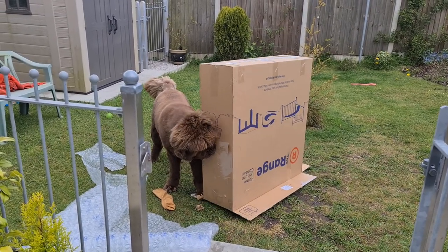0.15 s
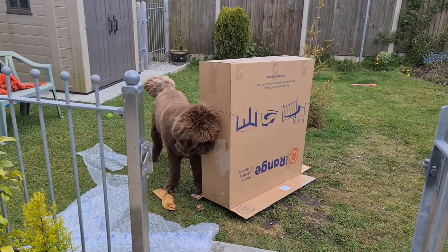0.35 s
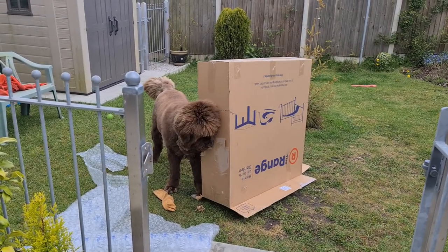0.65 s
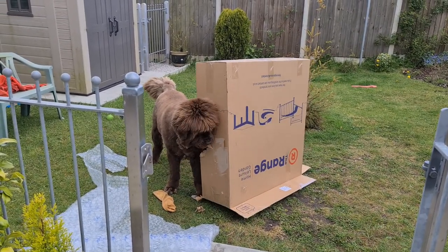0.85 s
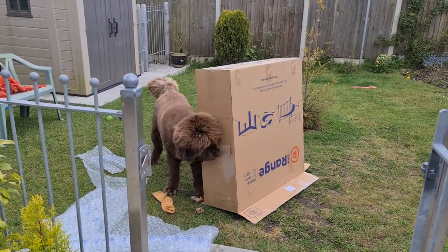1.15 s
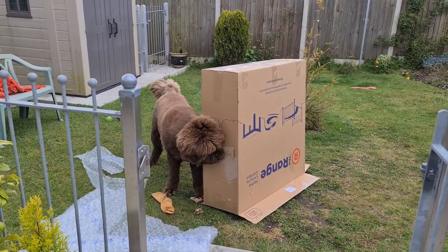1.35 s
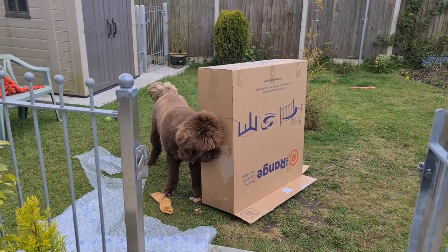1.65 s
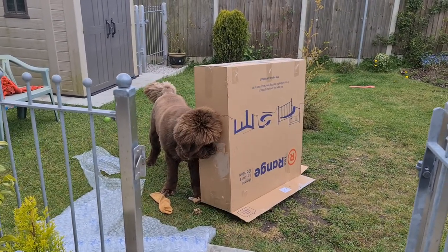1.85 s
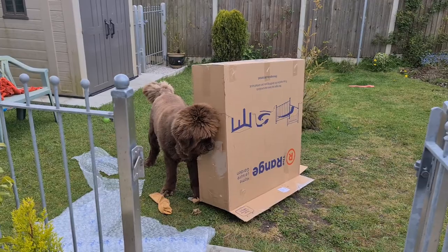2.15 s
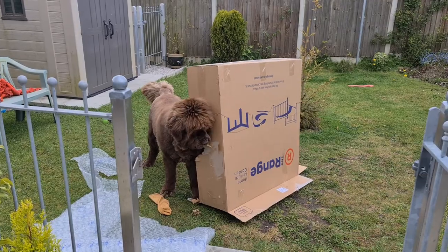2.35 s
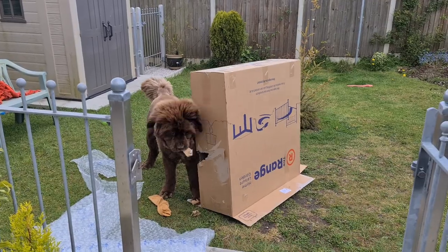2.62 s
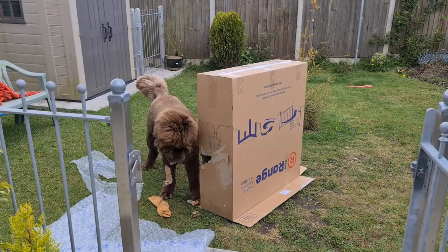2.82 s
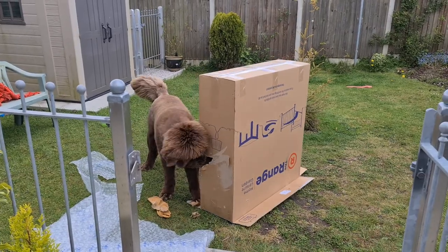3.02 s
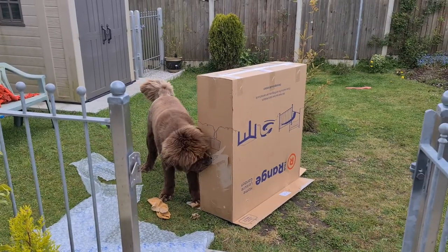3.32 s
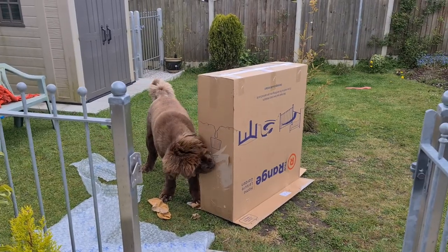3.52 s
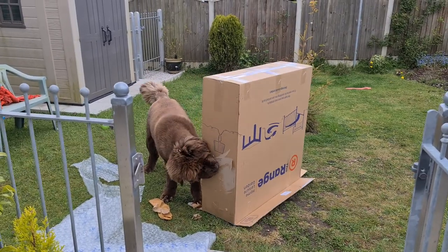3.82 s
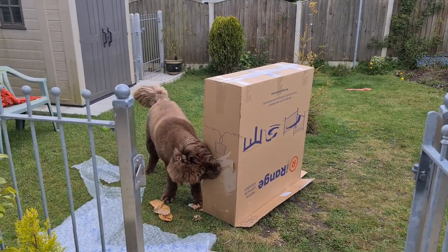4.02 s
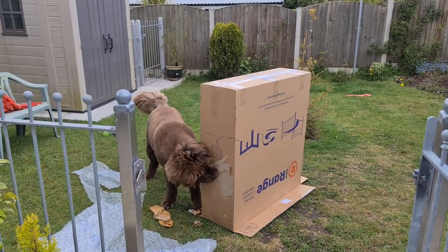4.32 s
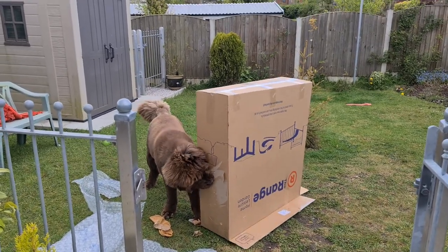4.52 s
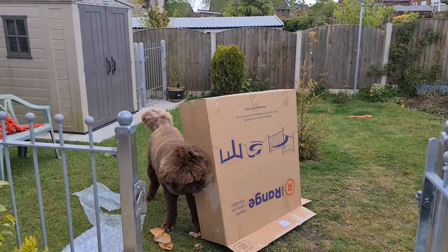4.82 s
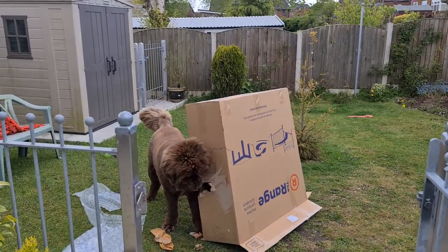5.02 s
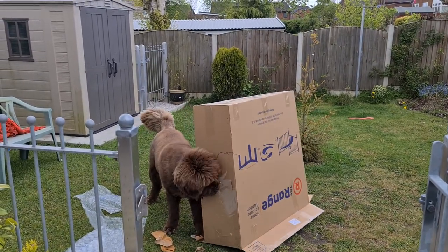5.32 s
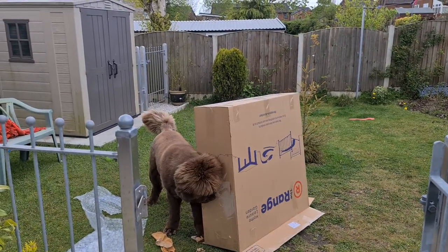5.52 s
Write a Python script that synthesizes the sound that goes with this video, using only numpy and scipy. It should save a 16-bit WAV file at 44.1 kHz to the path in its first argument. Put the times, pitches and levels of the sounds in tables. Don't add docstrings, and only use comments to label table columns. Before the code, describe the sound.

In a garden, a large dog chews a big empty cardboard box. Small pops and knocks come first, then drum-like jolts, a dense burst of booms, crunches and ripping midway, a lull with a bird's falling whistle, then hard knocks and sharp cracks before light scraping. A handheld stereo microphone a few metres away catches a short echo from fences and shed.

```python
import sys
import numpy as np
from scipy import signal
from scipy.fft import rfft, irfft, next_fast_len
from scipy.io import wavfile
from scipy.ndimage import uniform_filter1d, map_coordinates

SR = 44100
rng = np.random.default_rng(int(sys.argv[2]) if len(sys.argv) > 2 else 0)


def file_out(sig):
    cols = np.atleast_2d(sig).T
    lim = np.clip(cols, -1, 1)
    pcm = np.round(lim * 32767).astype(np.int16)
    wavfile.write(sys.argv[1], SR, pcm)


def volts(x):
    e = np.asarray(x, float) / 20
    return 10 ** e


N = 250047


def unit(x):
    return x / np.sqrt(np.mean(x ** 2) + 1e-20)


def along(points, hz):
    point_hz, value = np.transpose(points)
    return np.interp(np.log(hz + 1), np.log(point_hz + 1), value)


def filtered(x, response):
    size = next_fast_len(N + SR // 2)
    hz = np.fft.rfftfreq(size, 1 / SR)
    return irfft(rfft(x, size) * response(hz), size)[..., :N]


def wobble(rate_hz):
    knots = rng.standard_normal(int(N * rate_hz / SR) + 4)
    return map_coordinates(knots, [np.arange(N) * rate_hz / SR])


def fibres(spectrum, clump_db, spike_db, ring_db, crack=0):
    clumps_db = clump_db * wobble(45) + clump_db * wobble(220)
    size = volts(clumps_db + spike_db * wobble(1500))
    parting = rng.random(N) < 800 / SR
    size *= 1 + crack * rng.exponential(size=N) * parting
    z = signal.stft(size * rng.standard_normal((2, N)), nperseg=512)[2]
    field = uniform_filter1d(rng.standard_normal(z.shape[1:]), size=3, axis=0)
    field = uniform_filter1d(field, size=6, axis=1)
    rung = signal.istft(z * volts(ring_db * unit(field)), nperseg=512)[1][:, :N]
    return unit(filtered(rung, lambda hz: volts(along(spectrum, hz))))


# pitch_hz, level_db (per Hz)
HUSH_COLOUR = [(15, -85.5), (25, -23.5), (60, -18), (120, -25.5), (287, -2.5), (419, -9), (550, -2),
               (647, -3.5), (1810, -3.5), (3380, -15), (4440, -19), (8050, -18.5), (9220, -8.5),
               (10600, -15), (15000, -21.5), (16300, -39)]


def hush():
    level = volts(-65 + 0.52 * wobble(3.74))
    return level * fibres(HUSH_COLOUR, clump_db=-1.34, spike_db=2.5, ring_db=2.0)


def slope(start_s, end_s, rise_s, fall_s):
    t = np.arange(N, dtype=np.float32) / SR
    before = np.maximum(start_s - t, 0) / abs(rise_s)
    after = np.maximum(t - end_s, 0) / abs(fall_s)
    return -20 * (before + after)


# peak_s, level_db, rise_s (20 dB), fall_s (20 dB)
WEIGHT_HEAVES = [(0, -36.5, .02, 0.17), (.2, -44, 0.4, .5), (0.268, -33, 0.11, 0.05),
                 (.42, -39, 0.09, 0.1153), (.6, -51, -0.8, 0.3817), (.87, -38, 0.01, 0.2542),
                 (1.05, -50, 1.5, 0.77), (1.4, -54, 1, 1.5), (1.57, -48, 0.19, 0.2),
                 (1.83, -44.5, 0.19, -0.02), (1.96, -46.5, 0.58, 0.14), (2.22, -36, 0.0655, 0.21),
                 (2.34, -26, 0.1442, 0.2774), (2.46, -28, 0.0919, 0.1443), (2.56, -29.5, 0.1265, 0.0356),
                 (2.65, -51, .1, 0.18), (2.8, -58.5, .6, 0.47), (3.07, -53.5, -0.62, -3.17),
                 (3.21, -48, 0.3, -0.22), (3.53, -59, .3, 0.6), (3.72, -47, 0.1139, -0.05),
                 (3.82, -43, 0.19, 0.12), (3.99, -44.5, 0.107, 1), (4.13, -30, 0.1189, 0.29),
                 (4.3, -38, 0.1143, 0.27), (4.44, -47, 0.36, -0.33), (4.69, -34, 0.3264, 0.315),
                 (4.8, -30.5, 0.2834, 0.3187), (4.891, -27.5, 0.2914, 0.0591), (5, -39, 0.37, 0.1544),
                 (5.1, -50.5, 0.9, 0.13), (5.33, -46.5, -0.27, 0.38), (5.45, -53.5, .3, 1.78),
                 (5.57, -50, 0.28, -1)]


def heaves():
    pushes = [volts(db + slope(s, s, rise_s, fall_s)) for s, db, rise_s, fall_s in WEIGHT_HEAVES]
    return volts(-112) + np.max(pushes, axis=0)


# start_s, length_s, board_db, paper_db, swell_db (by the end)
HELD_PULLS = [(0.029, 0.1788, -55, -63, 7), (0.226, 0.0416, -51, -52.5, 5.5),
              (0.352, 0.0414, -52.5, -59, 7.5), (0.493, 0.0749, -63, -66.5, 4),
              (0.616, 0.024, -53, -54.5, 0.5), (0.81, 0.09, -37, -42, -4), (0.906, 0.47, -54, -67, -2),
              (1.408, 0.4586, -57, -62.5, 9.5), (1.877, 0.358, -50.5, -53, -2),
              (2.198, 0.1123, -43.5, -45.5, -2), (2.275, 0.187, -40.5, -44.5, 8.5),
              (2.458, 0.0964, -35, -34.5, 0.16), (2.495, 0.0657, -34, -37, -1),
              (3.114, 0.0496, -45, -75, 1), (3.191, 0.0422, -54.5, -74, -0.5),
              (3.356, 0.058, -62, -67.5, -11.5), (5.398, 0.111, -61.5, -71.5, 3),
              (3.58, 0.1184, -68, -90, 10.5), (4.053, 0.0573, -66.5, -90.5, 19),
              (4.332, 0.269, -57, -54.5, 0.1), (4.707, .18, -44.5, -52, 3.5), (4.86, .03, -40.5, -52.5, 4),
              (1.42, .45, -75, -75, 1), (5.026, 0.1478, -49.5, -59, -1.09),
              (5.239, 0.1172, -49.5, -76, 0.5), (5.544, 0.012, -56, -52.5, -1),
              (5.577, 0.103, -58.5, -74.5, -2.5), (5.197, 0.138, -70, -66, -0.5),
              (2.963, 0.112, -62, -72.5, 0.5)]
# start_s, board_db, paper_db, fall_s (20 dB)
GRIP_SLIPS = [(0, -53.5, -62.5, -1.38), (.268, -44, -50, 0.19), (0.405, -34, -42, 0.0623),
              (0.65, -36, -38.5, 0.0894), (1.378, -41.5, -75, 0.09), (2.14, -38, -40, 0.0766),
              (2.59, -54.5, -68, 0.2648), (2.778, -55.5, -71.5, 0.5), (3.123, -41.5, -63.5, 0.068),
              (3.712, -55.5, -66, 0.4361), (3.78, -50.5, -51.5, 0.05), (3.88, -50.5, -62, 0.08),
              (4.109, -32.5, -58, 0.09), (4.273, -47, -69, 0.25), (4.538, -39, -44.5, 0.398),
              (4.909, -41, -55.5, 0.1965), (5.37, -62.5, -80.5, 10.2)]
GRIP_S, LET_GO_S = 0.0157, 0.0224


def rubs():
    t = np.arange(N, dtype=np.float32) / SR
    rub_db = np.full((2, N), -95.)
    for s, length_s, board_db, paper_db, swell_db in HELD_PULLS:
        swell = swell_db * np.clip((t - s) / length_s, 0, 1)
        pull_db = np.array([board_db + swell, paper_db + 1.396 * swell])
        rub_db = np.maximum(rub_db, pull_db + slope(s, s + length_s, GRIP_S, LET_GO_S))
    for s, board_db, paper_db, fall_s in GRIP_SLIPS:
        slip_db = np.array([[board_db], [paper_db]])
        rub_db = np.maximum(rub_db, slip_db + slope(s, s, 0.00596, fall_s))
    return rub_db


# start_s, length_s, level_db
FLAP_DRAGS = [
    (0.641, 0.0077, -46.5),
    (0.807, 0.167, -65.5),
    (4.567, 0.05738, -52.5),
    (4.737, 0.161, -56.5),
    (0.998, 0.944, -68),
]


def drags(rub_db):
    slides = sum(volts(db + slope(s, s + length_s, GRIP_S, LET_GO_S)) for s, length_s, db in FLAP_DRAGS)
    return slides + volts(-18.5 + 0.2702 * rub_db[0] + 0.495 * rub_db[1])


def whistles(calls, blur_hz, clear, drop_s):
    out = np.zeros((2, N))
    for s, length_s, first_hz, held_hz, db in calls:
        t = np.arange(int(length_s * SR)) / SR
        pitch_hz = held_hz + (first_hz - held_hz) * np.exp(-t / drop_s)
        turn = 2 * np.pi * np.cumsum(pitch_hz) / SR
        a, b, c, d = (map_coordinates(knots, [t * blur_hz]) for knots in rng.standard_normal((4, 900)))
        left = (a + clear) * np.sin(turn) + b * np.cos(turn)
        right = c * np.sin(turn) + d * np.cos(turn)
        sway = np.array([left, right]) / np.hypot(1, clear)
        out[:, round(s * SR):][:, :len(t)] += volts(db) * np.sin(np.pi * t / length_s) ** .4 * sway
    return out * volts(2 * wobble(28))


# start_s, length_s, first_hz, held_hz, level_db
BIRD_CHIRPS = [
    (0, 0.1238, 7300, 7265, -62),
    (.266, 0.1006, 7600, 7440, -57),
    (.49, 0.153, 6200, 6104, -64),
    (.504, 0.1533, 7300, 7498, -61.5),
    (.95, 0.05, 5000, 4775, -59),
    (1.115, 0.0505, 4100, 4000, -55),
    (1.578, 0.0953, 8060, 7966, -62),
]
# start_s, length_s, first_hz, held_hz, level_db
BIRD_PHRASE = [
    (2.724, .03, 6600, 4600, -72),
    (2.8, .05, 5500, 4800, -67),
    (2.85, .13, 4950, 4900, -72),
    (2.956, .145, 4450, 3820, -62),
    (3.065, .04, 3600, 3050, -66),
]
# start_s, length_s, first_hz, held_hz, level_db
BIRD_PEEPS = [
    (3.012, .03, 4270, 4240, -63),
    (3.36, .15, 4300, 4290, -73),
    (3.872, .11, 4300, 4280, -67),
    (4.02, .05, 4300, 4280, -73),
    (5.385, .075, 4300, 4280, -71),
]


def bird():
    chirps = whistles(BIRD_CHIRPS, blur_hz=705.8, clear=.3, drop_s=.012)
    phrase = whistles(BIRD_PHRASE, blur_hz=298, clear=.6, drop_s=.012)
    peeps = whistles(BIRD_PEEPS, blur_hz=30.52, clear=2.5, drop_s=.012)
    return chirps + phrase + peeps


# pitch_hz, level_db, ring_s (time to die 60 dB)
WALL_TONES = [(50.64, 4.5, 0.403), (64.3, -3.5, 0.236), (101.76, 1.5, 0.131), (144.44, 2.5, 0.148),
              (174.03, 2, 0.0975), (226, -0.5, 0.1192), (295.46, -3, 0.1663), (374.7, -10, 0.117),
              (462.7, -10, 0.0976), (576.7, -12.5, 0.0896), (722.7, -13, 0.0886)]


def walls(hz):
    total = 0
    for k, (tone_hz, db, ring_s) in enumerate(WALL_TONES):
        loss = 1j * hz * np.log(1000) / (np.pi * ring_s)
        total = total + (-1) ** k * volts(db) * loss / (tone_hz * tone_hz - hz * hz + loss)
    return total


def strained_walls(shove):
    light = lambda hz: walls(hz) * hz ** 8 / (hz ** 8 + 145.2 ** 8)
    heavy = np.clip(shove / volts(-38.5), 0, 1) ** 0.462
    drive = volts(3.3 * wobble(30)) * rng.standard_normal((2, N))
    shaking = (1 - heavy) * unit(filtered(drive, light)) + heavy * unit(filtered(drive, walls))
    return volts(-5.0) * shove * shaking


# start_s, peak_db, struck_wall_hz, ring_length (factor)
BOX_YANKS = [(.072, -40, 147.3, 2.2), (.232, -47, 296, 1.3), (.65, -20.5, 158.1, 0.632),
             (.677, -25, 135, 0.4513), (.806, -20.5, 151, 0.79), (.847, -23.5, 226, 1.12),
             (.888, -36, 160, 2.765), (.95, -43, 60, 3), (5.03, -38.5, 60, 1.96), (1.129, -32.5, 147, 0.9),
             (1.883, -35, 195, 3.6), (2.139, -28, 298, 2.1), (2.192, -27.5, 296.6, 2.7),
             (2.286, -16.5, 168.2, 1.9), (2.331, -21, 185.3, 0.58), (2.348, -13.5, 148, 0.88),
             (3.778, -29.5, 149.3, 0.96), (3.88, -22, 141.6, 0.874), (3.966, -34, 140, 1.49),
             (4.337, -34.5, 143.7, 1.26), (4.906, -14, 144.6, 0.745), (5.208, -35, 160.4, 1.066)]
# start_s, peak_db, struck_wall_hz, ring_length (factor)
HEAD_BUMPS = [(0.255, -29, 226, 2.1), (.403, -26, 164.4, 1.75), (2.372, -23.5, 110, 3.72),
              (2.575, -38, 69, 2.84), (3.104, -19, 190, 0.825), (3.128, -26.5, 302.4, 0.8),
              (3.688, -40, 184.7, 0.83), (3.718, -35, 108, 0.69), (4.05, -42.5, 420, 1.47),
              (4.079, -32, 500, 0.8585), (4.105, -20.5, 164, 0.4495), (4.537, -8, 107, 0.622),
              (4.57, -16.5, 108.7, 1.14), (4.62, -21, 92.77, 0.73), (4.83, -31.5, 162, 1.507),
              (4.893, -26.5, 144, 2.2)]


def booms(shove):
    out, t = np.zeros((2, N + SR)), np.arange(SR // 2) / SR
    hz, level_db, ring_s = np.transpose(WALL_TONES)[..., None]
    jolts = [(*j, -19) for j in BOX_YANKS] + [(*j, -6) for j in HEAD_BUMPS]
    chances = rng.standard_normal((len(jolts), 3, 2, len(WALL_TONES), 1))
    for (s, db, tone_hz, ring, small_db), luck in zip(jolts, chances):
        deep_db = 1 + 0.835 * (20 * np.log10(shove[round(s * SR)]) - db)
        middle_db = -6 * np.abs(np.log2(hz / tone_hz))
        near_db = np.where(hz < 75, deep_db + 9.5, np.where(hz > 330, small_db + 5.0, middle_db))
        decay_db = 60 * t / (ring_s * np.clip(ring, .2, hz / 70))
        fade = volts(level_db + near_db + 2.78 * luck[0] - decay_db)
        fade *= 1 - np.exp(-t * hz * 1.596)
        fade *= 1 + 1.086 * np.exp(-t * hz / 0.995)
        turn = 2 * np.pi * hz * (1 + 0.05045 * luck[1]) * t + 0.246 * luck[2]
        wave = np.sum(fade * np.sin(turn), axis=1)
        start = round((s + .002) * SR)
        out[:, start:][:, :len(t)] -= volts(db + 1.48) * wave / np.abs(wave[0]).max()
    return out[:, :N]


# start_s, peak_db, pitch_hz
FLUTE_POPS = [(0.072, -38, 1702), (0.092, -31, 1693), (0.111, -35.5, 1656), (0.168, -37, 1686),
              (0.188, -35.5, 1654), (0.207, -38.5, 1732), (0.233, -29.5, 1655), (0.25, -28.5, 1670),
              (0.265, -33, 1122), (0.28, -27.5, 1570), (0.314, -37.5, 1548), (0.361, -41.5, 1572),
              (0.409, -29.5, 1337), (0.533, -45, 1420), (0.616, -40, 1670), (0.809, -26, 2133),
              (0.987, -37, 4404), (1.379, -30, 1724), (1.499, -40, 2130), (1.571, -39.5, 1686),
              (2.143, -30, 1622), (2.196, -32, 1410), (2.302, -23.5, 2054), (2.335, -29.5, 1200),
              (2.391, -26.5, 1864), (2.414, -21.5, 1350), (2.438, -24.5, 1280), (2.454, -29, 1247),
              (2.47, -23.5, 1115), (2.489, -29, 1785), (2.516, -19.5, 1208), (2.526, -28, 1730),
              (2.539, -21, 1131), (2.555, -23.5, 1183), (3.538, -53.5, 1790), (3.716, -41.5, 1150),
              (3.903, -39.5, 1233), (4.04, -52, 899.8), (4.112, -18, 1104), (4.272, -39.5, 1660),
              (4.403, -44.5, 1800), (4.554, -18.5, 1840), (4.68, -41, 1690), (4.727, -30, 1637),
              (4.763, -27.5, 1724), (4.825, -28.5, 1685), (5.08, -35, 2140), (5.226, -38.5, 5820)]


def pops():
    out, t = np.zeros(N + SR), np.arange(SR // 8) / SR
    for s, db, hz in FLUTE_POPS:
        ping = volts(-60 * t * hz / 32.64) * np.sin(2 * np.pi * hz * t) * (1 - np.exp(-t * hz))
        edge = volts(-13.5 - 60 * t / 0.002504) * rng.standard_normal(len(t))
        out[round(s * SR):][:len(t)] += volts(db - 3) * (ping + edge)
    return out[:N]


# start_s, peak_db, knock_db (board), flute_hz
TOOTH_CRUSHES = [(0.0736, -36.5, 7, 1667), (0.235, -26, 3, 1656), (0.2527, -26.5, 5, 1637),
                 (0.6528, -18, 5, 1594), (0.808, -33.5, 13.5, 2222), (0.8493, -26, 7.5, 1809),
                 (0.8905, -25.5, -9.5, 2030), (1.381, -50.5, 16, 1635), (1.4997, -52.5, 19.5, 2340),
                 (2.141, -41.5, -2, 1592), (2.2543, -45, 4, 1480), (2.2869, -27, 5.5, 1349),
                 (2.3024, -36.5, 11, 2010), (3.113, -52, 17, 1114), (3.1345, -53.5, 22, 1826),
                 (3.7808, -25.5, 2.5, 1226), (3.8825, -48.5, 8.5, 1157), (4.1059, -17, 11, 1063),
                 (4.2708, -61.5, 7.5, 1648), (4.538, -19.5, 15, 1976), (4.6205, -25, 8.5, 1726),
                 (4.7539, -27.5, 2.5, 1730), (4.8908, -25, 15.5, 1197), (4.908, -20.5, 6, 2231)]
# start_s, peak_db, click_db
PAPER_TICKS = [(.1565, -49.5, -19), (0.314, -40, 12), (0.4113, -18.5, -5.5), (2.195, -27.5, 0),
               (3.356, -47.5, 5.5), (3.902, -29.5, -8), (3.9659, -33, -0.1), (4.5734, -13.5, -12.5),
               (4.7051, -39, 6.5), (4.726, -22, 3.5), (4.889, -36, 14), (4.906, -32, 8),
               (5.542, -34.5, -10)]


def snaps():
    strength, flutes, t = np.zeros((3, N + SR)), np.zeros(N + SR), np.arange(SR // 8) / SR
    events = [(s, db, knock_db, knock_db - 11, hz) for s, db, knock_db, hz in TOOTH_CRUSHES]
    events += [(s, db, -8.5, click_db, 1514) for s, db, click_db in PAPER_TICKS]
    tail_s = np.array([[.045], [.06], [.05]])
    shape = volts(-60 * t / 0.00617) + .5 * volts(-60 * t / tail_s)
    shape *= 1 - np.exp(-t / 0.000952)
    for s, db, knock_db, click_db, flute_hz in events:
        start = round(s * SR)
        part_db = db - 8.5 + np.array([[0], [knock_db], [click_db]])
        strength[:, start:][:, :len(t)] += volts(part_db) * shape
        ring = volts(db + knock_db - 11 - 60 * t / .026) * np.sin(2 * np.pi * flute_hz * t)
        flutes[start:][:len(t)] += ring
    return (*strength[:, :N], flutes[:N])


# start_s, peak_db
BOARD_CRACKS = [
    (4.1059, -13.5),
    (4.538, -16.5),
    (4.8905, -6.5),
    (4.907, -11),
    (.6514, -23.5),
    (2.1, -27),
    (4.727, -25),
    (5.1, -35.5),
]


def cracks():
    out, t, pulse_s = np.zeros(N + SR), np.arange(SR // 8) / SR, 0.000118
    pulse = (1 - t / pulse_s) * np.exp(-t / pulse_s) * (1 - np.exp(-t * 28000.0))
    for s, db in BOARD_CRACKS:
        out[round(s * SR):][:len(t)] -= volts(db) * pulse
    return out[:N]


# start_s, length_s, first_hz, aimed_hz, level_db
MUZZLE_SLIDE = [
    (.92, .42, 5600, 2600, -64),
]


def muzzle():
    return whistles(MUZZLE_SLIDE, blur_hz=1900, clear=0, drop_s=.3)


# pitch_hz, level_db (per Hz)
BOARD_COLOUR = [(110, -8), (260, 5.5), (450, -2), (701, -1), (800, -5.5), (875, -10), (965, -2.5),
                (1150, -2), (1990, 0), (2440, -8), (3200, -13.5), (4160, -19), (7040, -120)]
# pitch_hz, level_db (per Hz)
GRASS_COLOUR = [(500, -53.5), (1650, -41), (2800, -6.5), (3520, -10.5), (3920, -17.5), (4430, -4),
                (5470, -12), (5930, -8), (6850, -13.5), (7330, -15.5), (8200, -12.5), (10700, -10.5),
                (18000, -120)]
# pitch_hz, level_db (per Hz)
PAPER_COLOUR = [(4410, -17), (7500, -10.5), (9480, -1), (11000, 1), (13200, -6), (14900, -1), (16000, -21),
                (16300, -60)]


def box():
    shove, rub_db = heaves(), rubs()
    scrape, rip = volts(rub_db)
    rustle = drags(rub_db)
    paper_snap, knock, click, crushed = snaps()
    flutes = (crushed + pops() + cracks()) * volts(2.5 * wobble(250))
    panels = strained_walls(shove) + booms(shove)
    board = np.hypot(scrape, knock) * fibres(BOARD_COLOUR, clump_db=1.0, spike_db=1.0, ring_db=2.7, crack=1.9)
    board += flutes * [[1.3], [.2]]
    grass = np.hypot(rustle, click) * fibres(GRASS_COLOUR, clump_db=1.0, spike_db=1.5, ring_db=2.5, crack=.9)
    paper = np.hypot(rip, paper_snap) * fibres(PAPER_COLOUR, clump_db=1.1, spike_db=1.0, ring_db=1.2, crack=.8)
    return panels + board + grass + paper


# pitch_hz, ring_s (time to die 60 dB)
YARD_ECHO = [(100, 0.275), (1500, 0.1475), (10000, 0.151)]


def yard(x):
    hz, t, z = signal.stft(rng.standard_normal((2, SR // 2)), SR, nperseg=256)
    fade = volts(-60 * t / along(YARD_ECHO, hz)[:, None])
    tail = signal.istft(z * fade, SR, nperseg=256)[1]
    late = np.pad(x, ((0, 0), (400, 0)))
    return signal.fftconvolve(late, tail / np.linalg.norm(tail[0]), axes=1)[:, :N]


# pitch_hz, likeness (0-1)
SIDE_LIKENESS = [(60, 0.9775), (250, 0.956), (700, 0.435), (1400, 0.22), (3800, 0.443), (9500, 0.452),
                 (15000, 0.273)]
# pitch_hz, left_minus_right_db
SIDE_BALANCE = [(60, -0.8), (120, -0.7), (240, -0.5), (480, -1), (950, -1.5), (1890, -3), (3770, 2.5),
                (7520, -2.5), (15000, -6.5)]
# pitch_hz, left_lead_rad
LEFT_LEAD = [(300, 0), (1900, -.2), (2300, 1.3), (3600, 1.3), (4300, -.4), (6000, .2), (6600, 2.6),
             (10200, 2.4), (11400, 3.3), (12300, 6.2), (13600, 8.8), (16000, 11)]


def ports(pair):
    turn = lambda hz: np.arccos(np.clip(along(SIDE_LIKENESS, hz), 0, 1)) / 2
    mid, side = filtered(pair, lambda hz: np.array([np.cos(turn(hz)), np.sin(turn(hz))]))
    half = lambda hz: volts(along(SIDE_BALANCE, hz) / 2) * np.exp(.5j * along(LEFT_LEAD, hz))
    return filtered(np.array([mid + side, mid - side]), lambda hz: np.array([half(hz), 1 / half(hz)]))


def scene():
    near = box() + bird() + muzzle()
    return ports(near + volts(-10.5) * yard(near) + hush())


def top_cut(x):
    return signal.sosfilt(signal.butter(12, 16050, fs=SR, output="sos"), x)


def record(dry):
    response = lambda hz: (1j * hz / (1j * hz + 36)) ** 4 * (hz < 16000)
    mix = filtered(dry, response)
    return top_cut(mix)


dry = scene()
out = record(dry)
file_out(out)
```